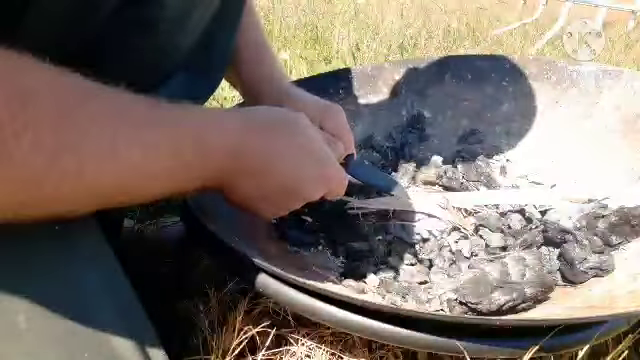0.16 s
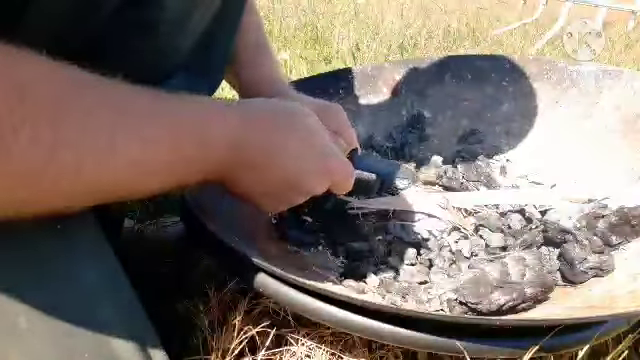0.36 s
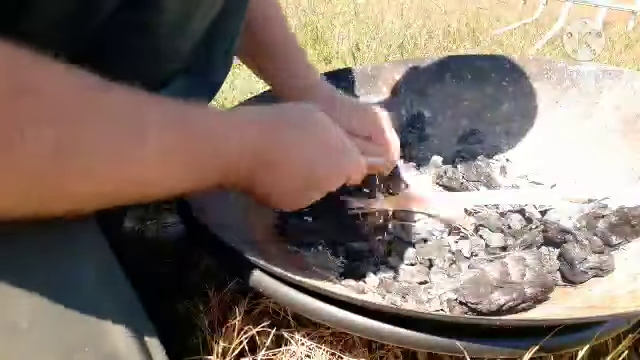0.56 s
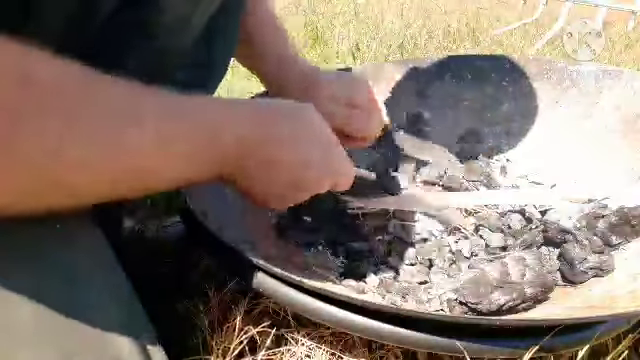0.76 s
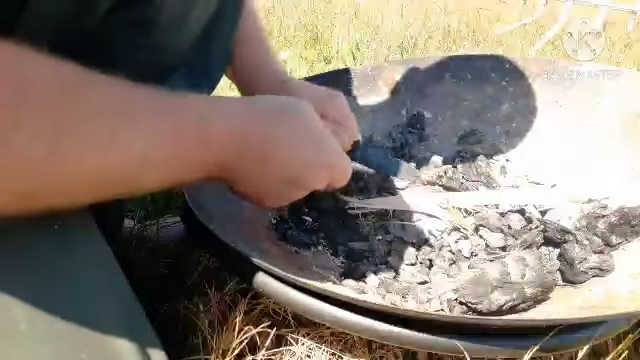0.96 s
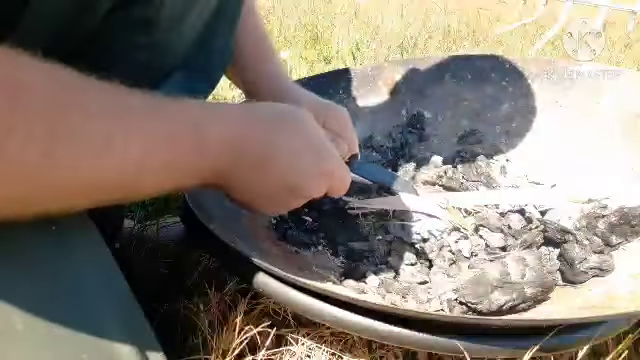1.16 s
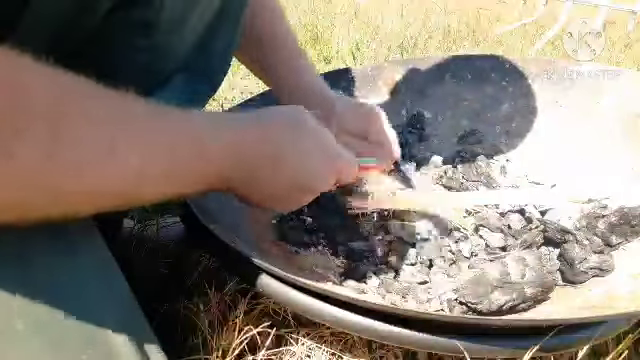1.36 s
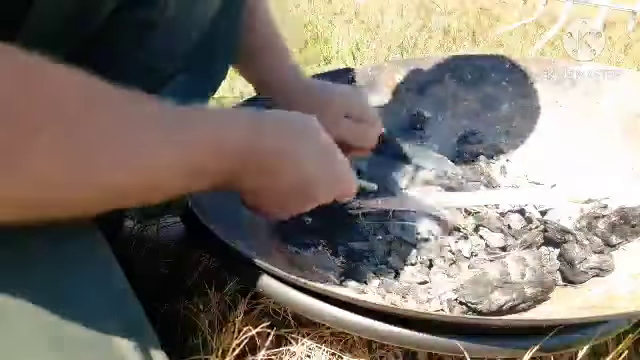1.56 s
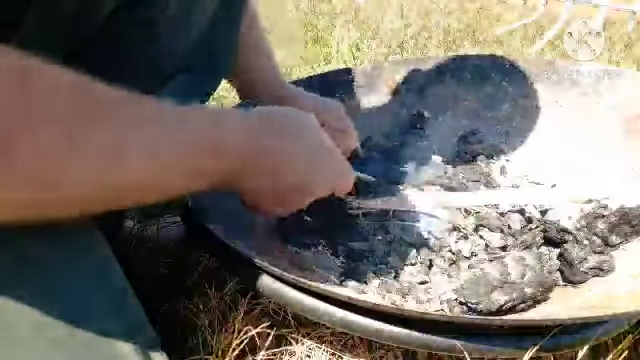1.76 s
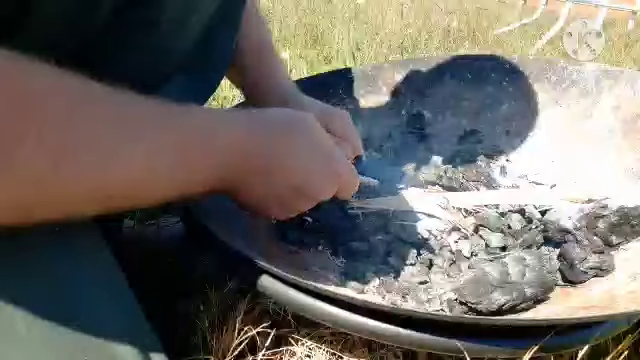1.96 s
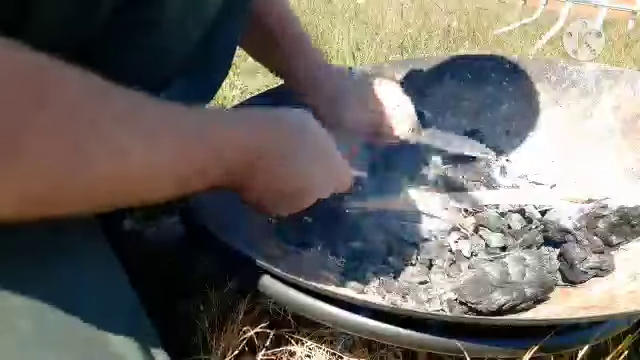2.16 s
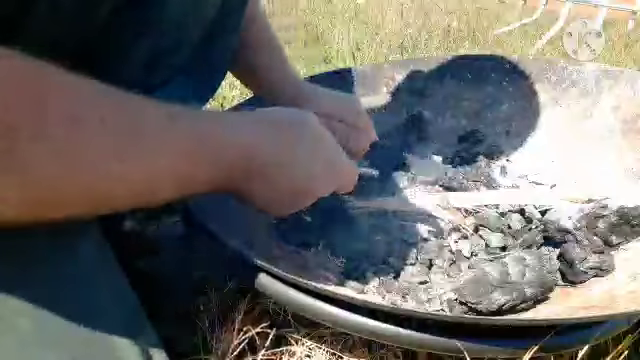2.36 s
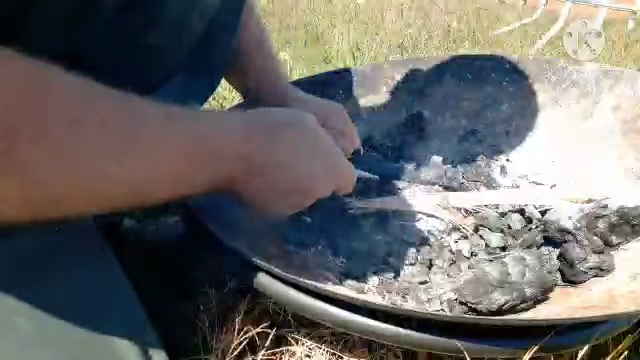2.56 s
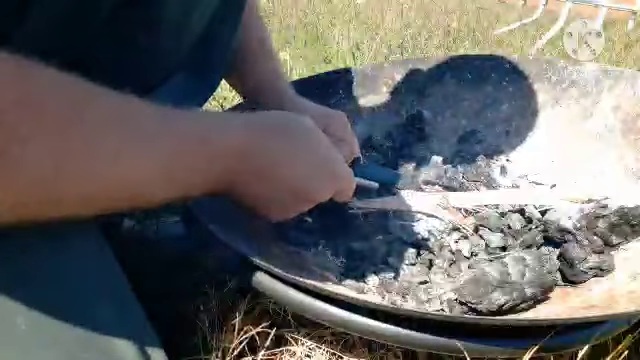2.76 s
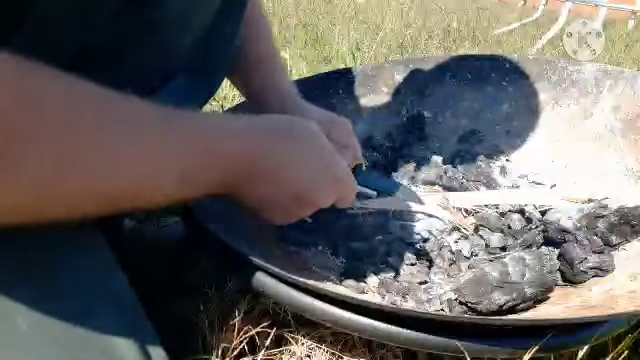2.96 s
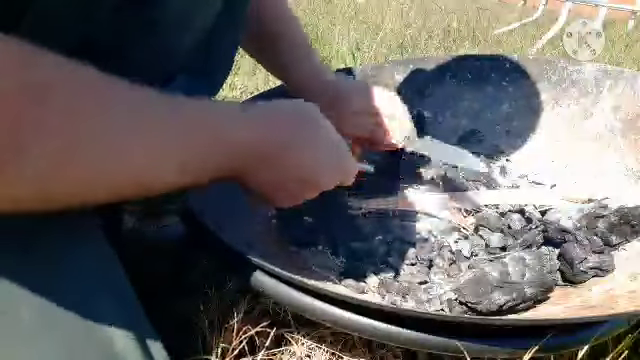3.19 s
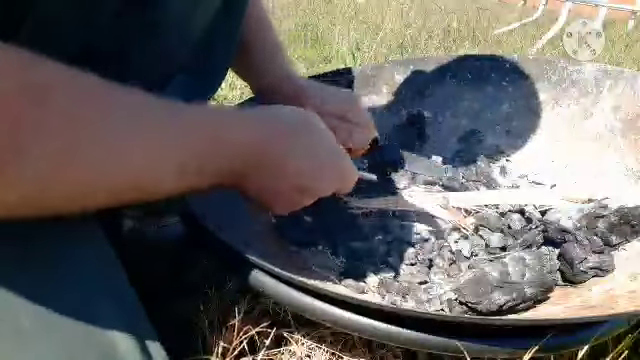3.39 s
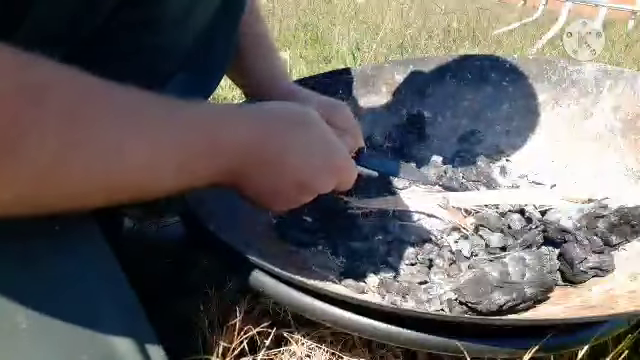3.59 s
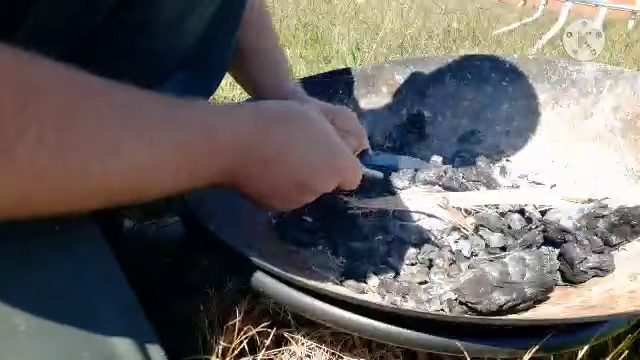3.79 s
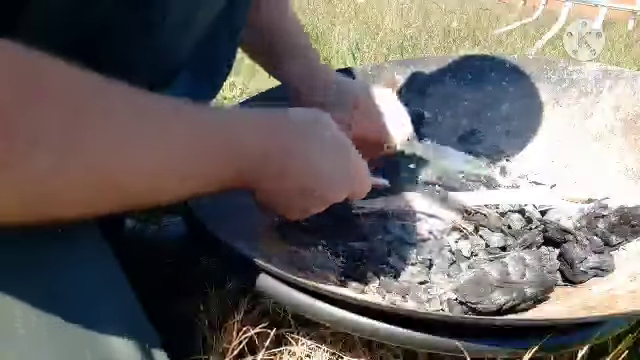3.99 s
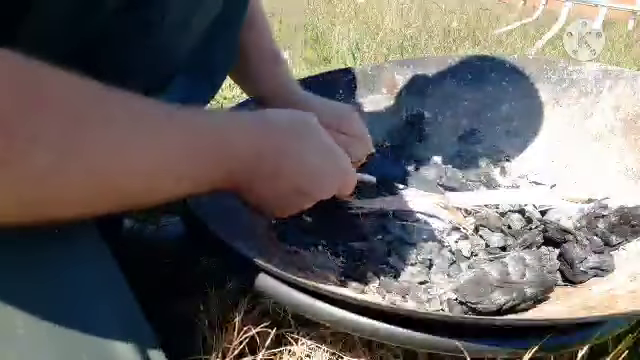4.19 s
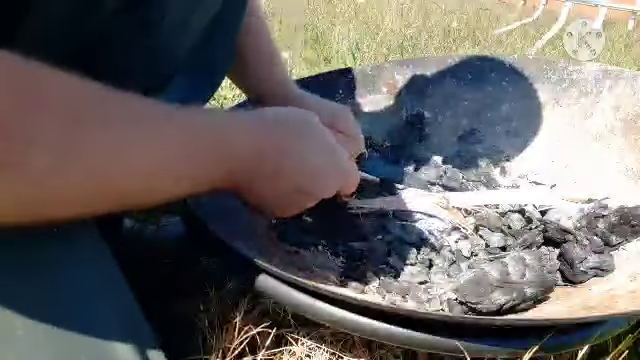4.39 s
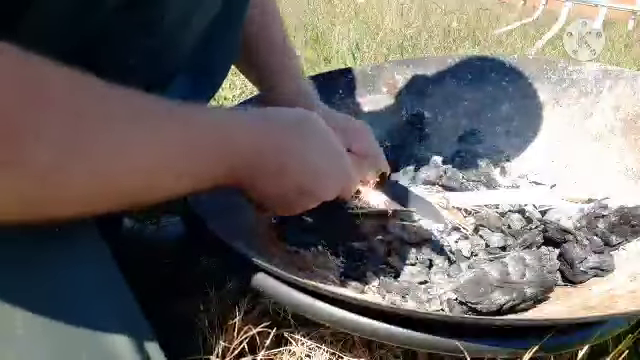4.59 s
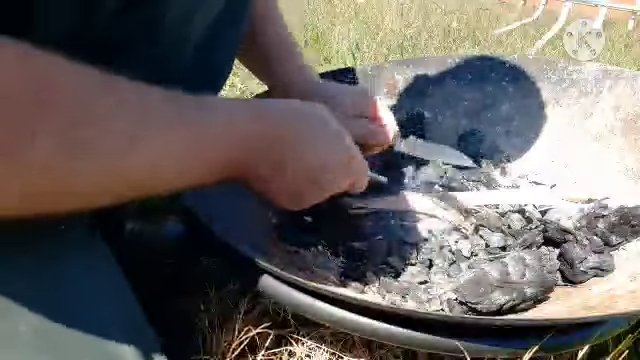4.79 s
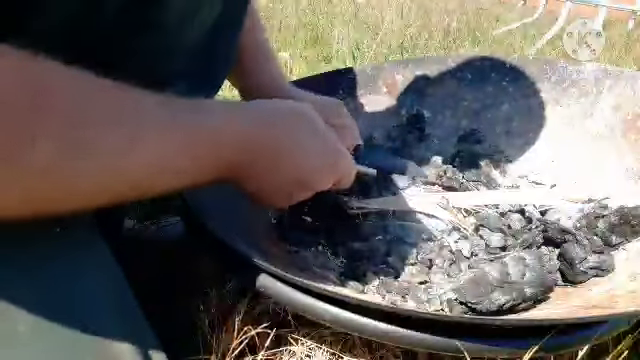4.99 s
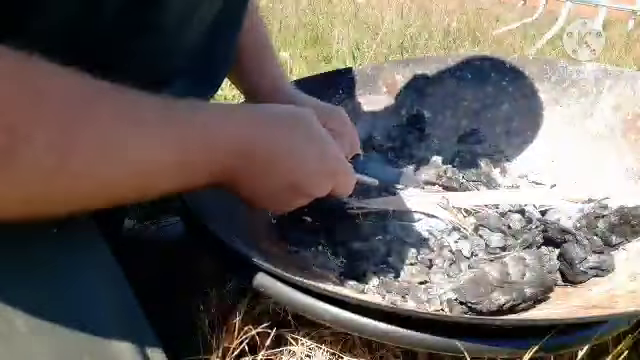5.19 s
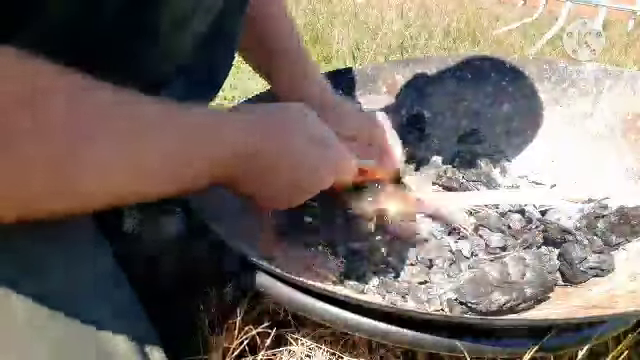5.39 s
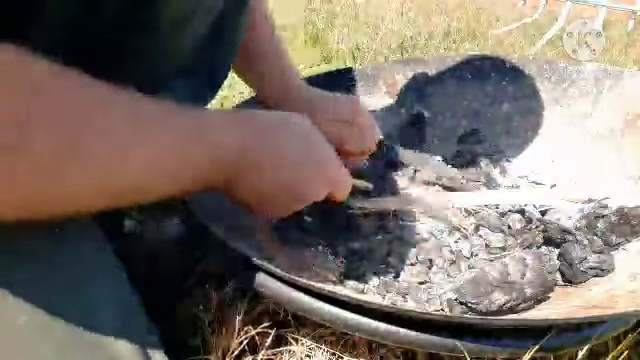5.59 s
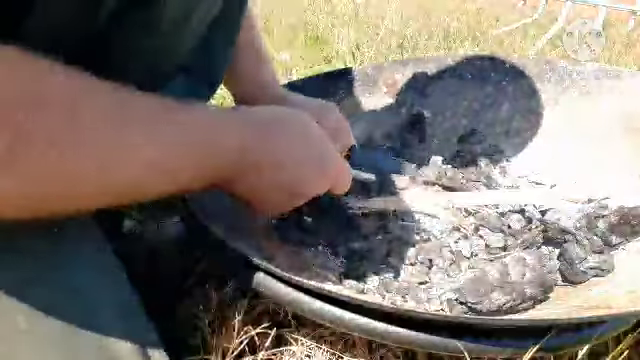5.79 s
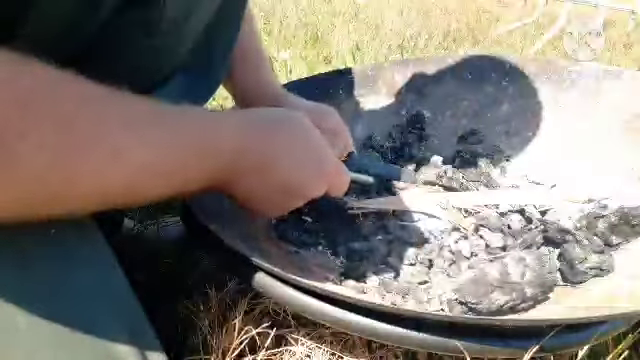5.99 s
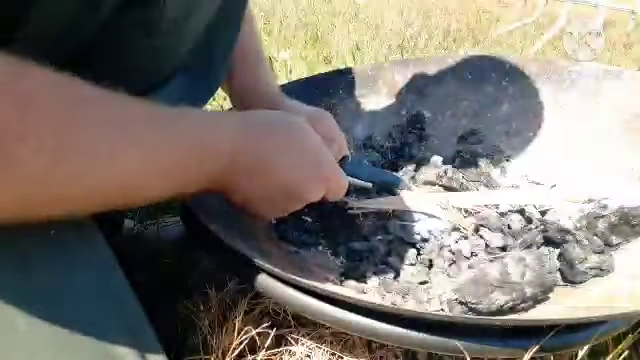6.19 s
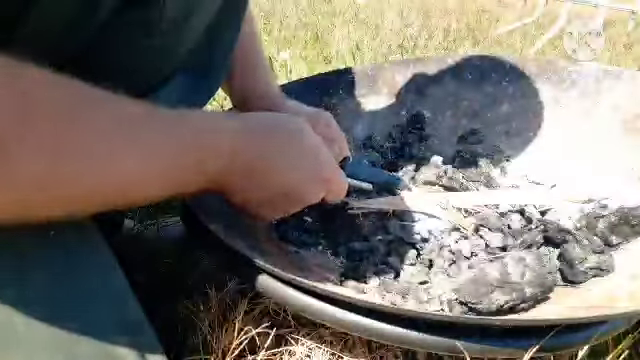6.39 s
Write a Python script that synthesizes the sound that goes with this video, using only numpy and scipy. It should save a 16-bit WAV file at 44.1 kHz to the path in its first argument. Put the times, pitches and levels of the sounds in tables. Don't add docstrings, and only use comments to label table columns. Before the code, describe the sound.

Open meadow, dry and close, with almost no reverberation. Shrill crickets trill continuously, a steady very high one on the right, lower ones mostly left, and a pulsing chorus behind. Far away a low engine hum rises, drops in pitch around 2.2 s as it changes gear, then slowly climbs again, with faint tyre hiss and soft wind rumble. In front, a knife scrapes down a spark rod at about 0.6, 1.4, 2.1, 3.15, 3.9, 4.65 and 5.4 s. Each stroke is a tiny swelling rasp, a sharp chattering metallic snap with a brief blade ring, then a grainy charcoal crunch and dull pan boom, over in roughly a tenth of a second. Lumps tick and roll after several strokes, most busily after the last, until 5.6 s. Between strokes, light blade taps, skin rubs and faint rustling of sleeves and grass. The end is left to crickets and the distant engine.

```python
import sys
import numpy as np
from scipy import signal
from scipy.fft import rfft, irfft
from scipy.io import wavfile

SR = 44100
rng = np.random.default_rng(int(sys.argv[2]) if len(sys.argv) > 2 else 0)


def voltage_ratio(level):
    return 10 ** (np.asarray(level, float) / 20)


def materialize(psi):
    bounded = np.clip(np.atleast_2d(psi).T, -1, 1)
    quanta = np.round(bounded * 32767).astype(np.int16)
    wavfile.write(sys.argv[1], SR, quanta)


N = 284445


def rms_one(x):
    return x / np.sqrt(np.mean(x ** 2) + 1e-20)


def noise(*shape):
    return rng.standard_normal(shape)


def in_time(rows):
    s, *columns = np.transpose(rows)
    return [np.interp(np.arange(N) / SR, s, c) for c in columns]


def in_strokes(tables, column):
    silent_db, fade_s = -110, .008
    rows = [(0, silent_db)]
    for table in tables:
        start, last = table[0][0], rows[-1][0]
        if start - last > .02:
            rows += [(last + fade_s, silent_db), (start - fade_s, silent_db)]
        rows += [(row[0], row[column]) for row in table]
    rows.append((rows[-1][0] + fade_s, silent_db))
    return voltage_ratio(in_time(rows)[0])


def swells(rows, rise_s):
    t = np.arange(N) / SR
    total = 0
    for s, db, dying_s in rows:
        total = total + voltage_ratio(db) * np.exp(-np.where(t < s, (s - t) / rise_s, (t - s) / dying_s))
    return total


def bursts(at_s, peak_db, t60, rise_s=0.00069):
    out = np.zeros(N)
    for s, db, decay, rise in np.broadcast(at_s, peak_db, t60, rise_s):
        first = round(s * SR)
        t = np.arange(min(2500, N - first)) / SR
        fall_db = 60 * np.maximum(t - rise, 0) / np.clip(decay, .004, .12)
        out[first:first + len(t)] += voltage_ratio(db - fall_db) * np.minimum(t / rise, 1)
    return out


def drift(rate):
    r = np.exp(-2 * np.pi * rate / SR)
    return rms_one(signal.lfilter([1], [1, -2 * r, r * r], noise(N + SR))[SR:])


def grains(per_s, spread_db):
    sizes = voltage_ratio(spread_db * np.minimum(rng.exponential(1, N), 4)) * rng.choice([-1, 1], N)
    return rms_one(sizes * (rng.random(N) < per_s / SR) + 1e-18)


def band(x, lo_hz, hi_hz, order=2):
    sos = signal.butter(order, [lo_hz, min(hi_hz, .45 * SR)], "band", fs=SR, output="sos")
    return signal.sosfilt(sos, x)


def coloured(x, spectrum):
    hz, db = np.transpose(spectrum)
    edges = np.geomspace(hz[0], hz[-1], round(2 * np.log2(hz[-1] / hz[0])) + 1)
    out = 0
    for k, (lo, hi) in enumerate(zip(edges, edges[1:])):
        level_db = np.interp(np.log(lo * hi) / 2, np.log(hz), db)
        out = out + (-1) ** k * voltage_ratio(level_db) * band(x, lo, hi, order=1)
    return out


def resonate(x, modes, widen):
    out = 0
    for k, (hz, width, db) in enumerate(modes):
        r = np.exp(-np.pi * width * widen / SR)
        poles = [1, -2 * r * np.cos(2 * np.pi * hz / SR), r * r]
        out = out + (-1) ** k * voltage_ratio(db) * signal.lfilter([1 - r, 0, r - 1], poles, x)
    return out


# frequency in Hz, density in dB per Hz.
AIR_COLOUR = [(140, -36.5), (230, -11.5), (246, -12.5), (373, -20.5), (659, -27), (1130, -26),
              (1370, -31.5), (1530, -21.5), (2200, -31), (4330, -35), (4980, -30), (6300, -28), (8190, -49),
              (13900, -120)]
# time in seconds, level in dB.
FAR_INSECTS = [(0, -62), (.6, -63), (3, -65.5), (5.5, -64), (6, -62), (6.45, -66.5)]
# peak in seconds, level in dB, dying time in seconds.
GUSTS = [(.3, -60.5, 0.18), (1.08, -58, .25), (4.69, -55.5, 0.042), (5.05, -68.5, 0.049),
         (5.39, -55.5, 0.07), (5.56, -71.5, 0.026), (5.76, -55, 0.062), (5.95, -60.5, 0.33)]


def meadow():
    white = noise(4, 2, N)
    hz, db = np.transpose(AIR_COLOUR)
    bins_hz = np.arange(N // 2 + 1) * SR / N
    tilt = voltage_ratio(np.interp(np.log(bins_hz + 1), np.log(hz), db))
    air = rms_one(irfft(rfft(white[0]) * tilt, N)) * voltage_ratio(-71.5)

    tyres_db = -77.5 - 1.05 * np.arange(N) / SR - 2 * drift(1.7)
    tyres = rms_one(band(white[3], 1150, 1400)) * voltage_ratio(tyres_db)

    hiss = band(white[1], 6200, 8110, order=4) * voltage_ratio(-2.0) + band(white[1], 10800, 17000, order=4)
    side_db = np.array([[2.5], [6]])
    hiss = rms_one(hiss) * voltage_ratio(in_time(FAR_INSECTS)[0] + side_db + 0.36 * drift(10) + 1.8 * drift(120))

    breeze = voltage_ratio(-66) + swells(GUSTS, rise_s=0.11)
    rumble = rms_one(band(white[2], 49, 89)) * breeze * voltage_ratio(5 + 1.3 * drift(6.8))

    stirs = [(bite_s + 0.096, -73, .15) for bite_s, *_ in STROKES]
    stirring = voltage_ratio(-80) + swells(stirs, rise_s=.03)
    rustle = rms_one(band(white[3], 1800, 5730)) * stirring * voltage_ratio(2.0 * drift(5))
    return air + rustle + tyres + hiss + rumble


# time in seconds, firing rate in Hz, firing level in dB rms,
# second order level in dB rms.
ENGINE = [(0, 74.44, -60, -64.5), (.18, 79.77, -44, -47.5), (.42, 81.81, -48, -44.5),
          (.62, 83.14, -61, -46), (.76, 90.48, -51.5, -55.5), (1.2, 95.46, -40, -55),
          (1.45, 102.8, -51, -61), (2.03, 110.6, -51.5, -63), (2.2, 98.73, -46, -56),
          (2.37, 85.6, -50.5, -49), (2.69, 91.34, -52.5, -60), (3.21, 93, -44, -60.5),
          (3.61, 94.5, -51, -66.5), (4.0, 97.7, -40.5, -54), (4.42, 98.18, -41.5, -71.5),
          (4.66, 98.7, -44, -60.5), (5.4, 104.9, -48.5, -62), (6.45, 112.6, -48.5, -65)]
# peak in seconds, level in dB rms, dying time in seconds.
THIRD_ORDER = [(.33, -65.5, 0.25), (2.42, -72.5, 0.054), (4.25, -84, 0.13), (4.95, -74.5, 0.14),
               (5.3, -70, 0.13)]
# time in seconds, frequency in Hz, level in dB.
WHINE = [(0, 332.7, -92), (.15, 345.4, -73), (.5, 355.3, -74.5), (1.2, 382, -82.5), (1.5, 422.3, -88),
         (6.45, 377, -110)]


def engine():
    firing_hz, firing_db, second_db = in_time(ENGINE)
    levels = voltage_ratio(firing_db), voltage_ratio(second_db), swells(THIRD_ORDER, rise_s=0.41)
    turn = 2 * np.pi * np.cumsum(firing_hz) / SR
    tone = np.zeros(N)
    for order, level in enumerate(levels, start=1):
        flutter = voltage_ratio(2.5 + 0.77 * drift(3.55))
        tone += level * flutter * np.sin(order * turn + 0.35 * drift(6.9))
    whine_hz, whine_db = in_time(WHINE)
    tone += voltage_ratio(whine_db + 1) * np.sin(2 * np.pi * np.cumsum(whine_hz) / SR + 1.2 * drift(11))
    road = rms_one(band(noise(N), 60, 200, order=3)) * voltage_ratio(-63 + 1.5 * drift(3))
    return (tone + road) * voltage_ratio([[-1.4], [1.2]])


def trill(beat, hz, open_share, arch_hz, wobble_hz):
    part = np.clip(beat % 1 / open_share, 0, 1)
    stroke = (beat - beat.min()).astype(int)
    luck = noise(stroke.max() + 1, 2)[stroke]
    shape = np.sin(np.pi * part ** .58) * voltage_ratio(1.4 * luck[:, 0])
    pitch = hz - arch_hz * (2 * part - .7) ** 2 + wobble_hz * luck[:, 1]
    return rms_one(shape * np.sin(2 * np.pi * np.cumsum(pitch) / SR))


def crowd(singers, unsteady, open_share, wobble_hz):
    out = 0
    for hz, per_s, db, left_right_db in singers:
        beat = np.cumsum(per_s * (1 + unsteady * drift(25))) / SR + rng.random()
        voice = trill(beat, hz, open_share, arch_hz=68.5, wobble_hz=wobble_hz)
        side_db = np.array([[left_right_db / 2], [-left_right_db / 2]])
        out = out + voice * voltage_ratio(db + 1.4 * drift(14) + side_db)
    return out / np.std(out.mean(axis=0))


# pitch in Hz, wing strokes per second, level in dB, left over right in dB.
LOW_CRICKETS = [(7480, 64.3, -5, 28), (7320, 60.0, -0.5, 4.5), (6940, 60, -7, 11)]
CHORUS = [(9870, 71.0, 0, -4), (9930, 80.5, -1, -1), (10080, 62.0, -4, -4), (9700, 75.0, -5, 2)]
# time in seconds, swells so far (count).
SWELL_COUNT = [(-.04, -1), (1.03, 11), (1.4, 14), (2.55, 27), (3.29, 33), (3.47, 35), (4.22, 41),
               (4.51, 44), (4.81, 46), (5.43, 52), (6.46, 63)]


def crickets():
    near_beat = -.07 + 71.85 * np.arange(N) / SR
    near = trill(near_beat, 10950, open_share=.62, arch_hz=400., wobble_hz=50.) * voltage_ratio(-52)
    near = np.stack([voltage_ratio(-12.0) * np.roll(near, 24), voltage_ratio(4.5) * near])
    swell_db = 3.5 * np.cos(2 * np.pi * in_time(SWELL_COUNT)[0])
    murmur = rms_one(band(noise(2, N), 9396, 10600, order=4)) * voltage_ratio(-60 + 0.67 * swell_db)
    low = voltage_ratio(-63.5) * crowd(LOW_CRICKETS, unsteady=0.12, open_share=0.5, wobble_hz=45.)
    chorus = voltage_ratio(-62.5 + swell_db) * crowd(CHORUS, unsteady=0.076, open_share=0.58, wobble_hz=120.0)
    return near + murmur + low + chorus


# start in seconds, length in seconds, ring in Hz,
# width in Hz, level in dB.
RUBS = [(0.045, 0.25, 1290, 198, -75), (0.754, 0.064, 1930, 300, -65), (1.552, 0.044, 2170, 180, -59),
        (2.187, .3, 350, 200, -71.5), (2.451, 0.027, 12500, 1200, -46), (6.04, 0.091, 1912, 1197, -72)]


def rubs():
    out = np.zeros(N)
    for s, length_s, hz, width, db in RUBS:
        first, count = round(s * SR), round(length_s * SR)
        brush = rms_one(resonate(noise(14000), [(hz, width, 0)], widen=1))
        out[first:first + count] += voltage_ratio(db) * brush[:count] * np.hanning(count)
    return out


# start in seconds, peak in dB, treble against peak in dB, ring in Hz.
LUMPS = [(0.6643, -28, 9, 3070), (0.685, -27.5, 9, 5440), (0.746, -51, 8, 1970), (0.771, -55, 4, 2030),
         (1.4853, -41.5, 1.5, 5600), (2.165, -38, -12, 1630), (2.1747, -54, -10.5, 3274),
         (3.2664, -45.5, -3, 2060), (3.976, -24.5, 5, 1530), (4.0266, -46.5, -28, 2100),
         (5.4836, -26.5, 10, 1463), (5.4923, -33, -10.5, 2550), (5.5125, -24, 4, 3460),
         (5.5342, -64, -5.5, 1540), (5.562, -32, 10.5, 6450), (5.587, -42, -4, 2070),
         (5.603, -40, 4.5, 5266)]
TOUCHES = [(0.0942, -51, -8, 4770), (1.5606, -52, -18, 2080), (1.5984, -44, -16, 2980),
           (1.6143, -49.5, -10, 3100), (1.7803, -32, -1, 5100), (2.458, -41.5, -4, 3120),
           (2.4884, -40, -1, 5500), (3.078, -32, -14, 1530), (3.5248, -34.5, -15, 5040),
           (4.1407, -53, -4, 1480), (4.374, -54, -0.5, 1500), (5.0573, -48, -38, 2585),
           (5.079, -56, -18, 2670), (6.0464, -60, -5.5, 1969)]


def ticks():
    s, peak_db, treble_db, ring_hz = np.transpose(LUMPS + TOUCHES)
    kinds = [len(LUMPS), len(TOUCHES)]
    t60 = np.repeat([.032, 0.073], kinds)
    is_touch = np.repeat([False, True], kinds)
    t60[is_touch & (peak_db > -40)] = 0.015
    rise_s = np.repeat([0.0028, .0006], kinds)
    grit = grains(per_s=6600, spread_db=3.0)
    grit[np.round((s + .0008) * SR).astype(int)] = 4.0
    out = rms_one(band(grit, 6500, 14000)) * bursts(s, peak_db + treble_db - 19.5, t60, rise_s)
    dull = rms_one(band(grit, 1170, 9100))
    for k, hz in enumerate(ring_hz):
        first = round(s[k] * SR)
        at = slice(first, first + 3000)
        body = dull[at] + 2.2 * resonate(dull[at], [(hz, 320, 0)], widen=1)
        out[at] += body * bursts(s[k], peak_db[k] - 9.5, t60[k], rise_s[k])[at]
    return out


# push in seconds, entry level in dB, crush level in dB,
# thud level in dB, settling in seconds.
PLOUGHS = [(0.03, -43, -34.5, -43, 0.1), (0.043, -34, -33.5, -39.5, 0.027),
           (0.048, -27.5, -36.5, -36.5, 0.059), (0.053, -32.5, -34, -40, 0.027),
           (0.033, -34.5, -33, -40, 0.048), (0.039, -38, -30.5, -33.5, 0.045),
           (0.041, -33.5, -31, -38, 0.15)]


def charcoal_phases():
    tables = []
    for (bite_s, *_), (push_s, entry_db, crush_db, thud_db, settle_s) in zip(STROKES, PLOUGHS):
        entry_s = bite_s + .017
        end_s = entry_s + push_s
        eased_db, eased_thud_db = crush_db - 7, thud_db - 6.5
        tables.append([(entry_s, entry_db, thud_db - 5),
                       (entry_s + 0.42 * push_s, crush_db, thud_db),
                       (end_s, eased_db, eased_thud_db),
                       (end_s + 0.0059, eased_db - 9.5, eased_thud_db - 9),
                       (end_s + 0.0037 + settle_s, -65.5, -70)])
    return tables


# frequency in Hz, density in dB per Hz.
CRUNCH_COLOUR = [(410, -28), (700, -8), (1310, -7.5), (1510, -8.5), (2230, -6), (5570, -8.5), (8790, -9.5),
                 (11300, -12.5), (15800, -10)]
# frequency in Hz, width in Hz, level in dB.
PAN = [(132, 21, 3), (286, 140, 2.5), (412, 7.7, 6), (799.2, 160, -4.5)]


def plough():
    phases = charcoal_phases()
    crush = grains(per_s=14000, spread_db=2.8) * voltage_ratio(1.5 * drift(150))
    crunch = rms_one(coloured(crush, CRUNCH_COLOUR)) * in_strokes(phases, column=1) * voltage_ratio(3.0)
    s, peak_db, *_ = np.transpose(LUMPS)
    knocks = bursts(s, peak_db - 13.5, t60=0.034)
    boom = resonate(band(crush, 110, 1000), PAN, widen=1.6) + .3 * band(crush, 130, 650)
    return crunch, rms_one(boom) * (in_strokes(phases, column=2) + knocks)


# edge bites at in seconds, run-up ends at in dB, bite level in dB,
# edge leaves the rod at in dB.
STROKES = [(0.589, -26, -19.5, -43), (1.385, -29.5, -22, -26), (2.098, -28.5, -16, -40),
           (3.152, -30, -18, -51), (3.92, -32, -25, -22.5), (4.654, -25.5, -25, -29.5),
           (5.411, -30, -22.5, -32)]


def rod_phases():
    tables = []
    for s, light_db, bite_db, leave_db in STROKES:
        run_up = [(s - 0.023, light_db - 20.5), (s - .002, light_db)]
        bite = [(s, light_db + 2), (s + 0.01, bite_db), (s + 0.024, leave_db)]
        tables += [run_up, bite]
    return tables


# time in seconds, peak in dB.
CATCHES = [(0.5897, -19), (0.5951, -4.5), (0.5988, -12.5), (0.6036, -15), (0.6197, -21), (1.3852, -13.5),
           (1.3906, -22.5), (1.3974, -11.5), (1.4194, -25), (2.0985, -12.5), (2.1054, -5.5), (2.1079, -3.5),
           (2.114, -14), (2.1164, -12), (3.1558, -15), (3.161, -10), (3.163, -11.5), (3.1702, -12),
           (3.1907, -13), (3.9254, -17), (3.93, -18.5), (4.6559, -29), (4.664, -14), (4.6605, -3.5),
           (5.4141, -15.5), (5.4187, -18), (5.424, -6.5), (5.4352, -17), (5.4535, -17)]
# frequency in Hz, width in Hz, level in dB.
BLADE = [(1368, 170, -1), (3005, 150, 0), (4037, 39, 1.5), (5500, 350, -2), (6990, 69, 6.5),
         (7460, 160, -5), (9180, 94, -1), (11424, 540, -1.5), (12000, 29, -13), (14100, 93, -20),
         (14990, 44, -24.5)]
# frequency in Hz, density in dB per Hz.
SCRAPE_COLOUR = [(240, -61), (400, -24), (1810, -4.5), (2950, -4.5), (3450, -7), (7100, -9), (8280, -19.5),
                 (11400, -11.5), (15800, -18.5)]


def blade_voice(x):
    return coloured(x, SCRAPE_COLOUR) * voltage_ratio(9.0) + resonate(x, BLADE, widen=1.3) * voltage_ratio(6.5)


def scrape():
    nicks = grains(per_s=11000, spread_db=3.0)
    chips = grains(per_s=2100, spread_db=4.5)
    s, peak_db = np.transpose(CATCHES)
    snaps = np.zeros(N)
    snaps[np.round((s + .0006) * SR).astype(int)] = voltage_ratio(peak_db + 1.5)

    phases = rod_phases()
    level = in_strokes(phases, column=1)
    slide = voltage_ratio(-4.5) * nicks * level
    is_light = in_strokes(phases[::2], column=1) / (level + 1e-9) > .9
    thin = voltage_ratio(5.5) * band(slide, 6500, 19000) + 0.2 * band(slide, 3500, 6500)
    slide = np.where(is_light, thin, slide)

    chatter = (chips + 0.24 * nicks) * bursts(s, peak_db - 9.0, t60=0.013)
    return blade_voice(slide + snaps + chatter + 1e-18) / np.std(blade_voice(nicks))


# delay in ms, gain (factor).
ECHOES = [
    [(.12, -0.067), (.29, -0.17)],
    [(.05, -0.04), (.2, 0.25)],
]


def near_field(x):
    out = np.stack([x, x])
    for side, echoes in enumerate(ECHOES):
        for ms, gain in echoes:
            out[side] += gain * np.roll(x, round(ms * SR / 1000))
    t = np.arange(700) / SR
    scatter = band(noise(2, len(t)) * voltage_ratio(-60 * t / .02), 4000, 19000, order=1)
    scatter = scatter / np.linalg.norm(scatter[0])
    paths = signal.fftconvolve(x[None], scatter, axes=1)[:, :N]
    posture = 1.5 * drift(6)
    wide = voltage_ratio(-2.5) * (np.cos(posture) * paths[0] + np.sin(posture) * paths[1])
    return (out + wide * [[1], [-1]]) * voltage_ratio([[-1.5], [-.2]])


def scene():
    crunch, thud = plough()
    hands = near_field(scrape() + crunch + ticks() + rubs())
    return hands + thud * voltage_ratio([[-.3], [.3]]) + crickets() + engine() + meadow()


def band_limit(x):
    return signal.sosfilt(signal.butter(12, 15960, fs=SR, output="sos"), x)


def record(dry):
    top_cut = signal.ellip(10, .3, 70, 15550, fs=SR, output="sos")
    mix = signal.sosfilt(top_cut, dry)
    return band_limit(mix)


dry = scene()
out = record(dry)
materialize(out)
```